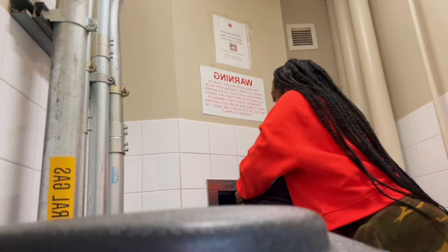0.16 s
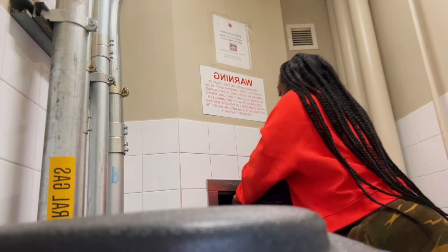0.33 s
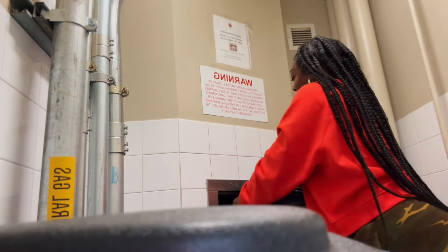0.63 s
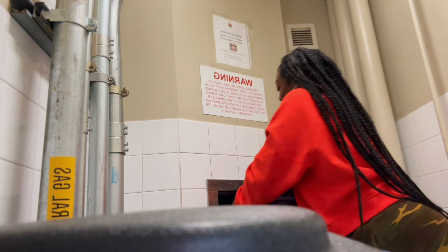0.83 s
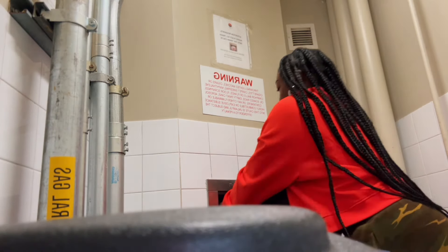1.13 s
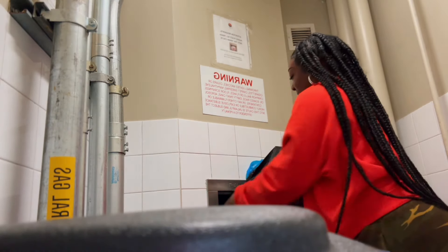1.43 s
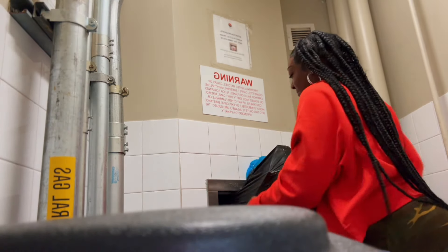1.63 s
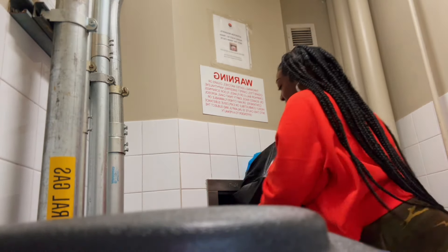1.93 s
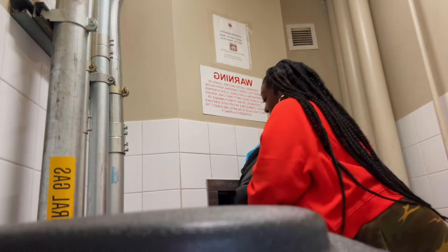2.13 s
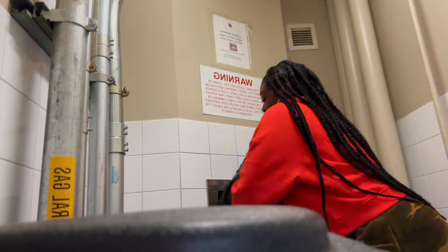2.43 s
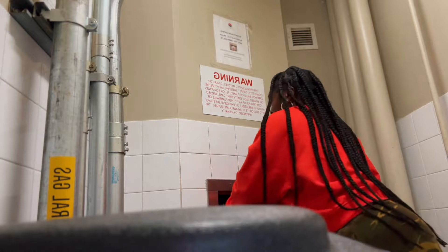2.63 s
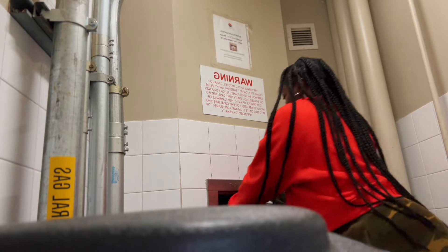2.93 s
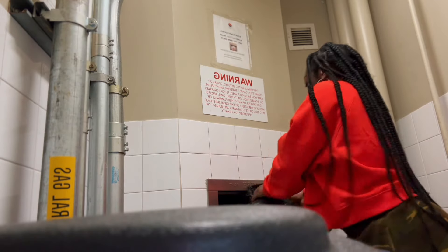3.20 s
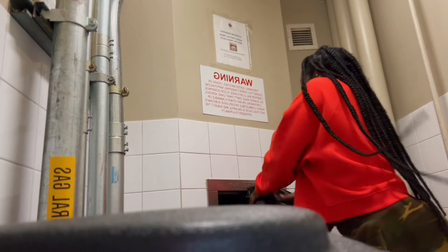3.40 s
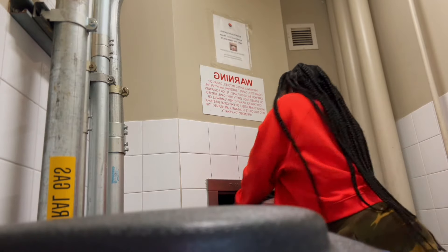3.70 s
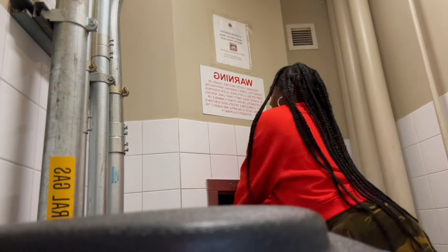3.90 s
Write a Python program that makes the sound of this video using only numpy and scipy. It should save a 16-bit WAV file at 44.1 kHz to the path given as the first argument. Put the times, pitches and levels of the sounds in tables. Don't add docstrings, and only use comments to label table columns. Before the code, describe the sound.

Close, busy crinkling of plastic film being pushed over hollow sheet steel, bumping and thudding in a small tiled room.

```python
import sys
import numpy as np
from scipy import signal
from scipy.fft import rfft, irfft, next_fast_len
from scipy.io import wavfile
from scipy.ndimage import uniform_filter1d

SR = 44100
rng = np.random.default_rng(int(sys.argv[2]) if len(sys.argv) > 2 else 0)


def to_wav(s):
    ch = np.atleast_2d(s).T
    pcm = np.round(np.clip(ch, -1, 1) * 32767)
    wavfile.write(sys.argv[1], SR, pcm.astype(np.int16))


def volts_from_decibels(level):
    exponent = np.asarray(level, float) / 20
    return 10 ** exponent


N = 178683

# pitch in Hz, level in dB, decay time t60 in s.
HOPPER_MODES = [(57, -31, 0.14), (87, 9, 0.24), (141.1, -8.5, 0.76), (163.4, 1.5, 0.23), (206.2, 0, 0.25),
                (272.3, -1.5, 0.14), (298.2, -3.5, 0.19), (361.3, -1, 0.18), (421.2, -1, 0.078),
                (504, -5, 0.014), (528, -7.5, 0.041), (594, -3, 0.13), (673, -3.5, 0.11),
                (694, -11.5, 0.14), (807, -3.5, 0.021), (780, -6, 0.0069), (888, -5, 0.064),
                (1026, -3, 0.02), (1054, -11, 0.037), (1275, -2, 0.1), (1650, -2, 0.014)]


def rms_one(x):
    return x / np.sqrt(np.mean(x ** 2) + 1e-20)


def over_hz(rows, size):
    hz, *columns = np.transpose(rows)
    grid = np.log(np.maximum(np.fft.rfftfreq(size, 1 / SR), 10))
    return [np.interp(grid, np.log(hz), column) for column in columns]


def drift(rate_hz):
    settle = 8000
    r = np.exp(-2 * np.pi * rate_hz / SR)
    noise = rng.standard_normal(N + settle)
    return rms_one(signal.lfilter([1], [1, -2 * r, r * r], noise)[settle:])


def ring(force, hz, t60):
    r = volts_from_decibels(-60 / (t60 * SR))
    w = 2 * np.pi * hz / SR
    return signal.lfilter([0, np.sin(w)], [1, -2 * r * np.cos(w), r * r], force + 1e-18)


def cut(x, hz, kind):
    return signal.sosfilt(signal.butter(3, hz, kind, fs=SR, output="sos"), x)


def efforts(rows, curve):
    s, db, rise, fall, last = np.transpose(rows)[:, :, None]
    dt = np.arange(N) / SR - s
    away = np.where(dt < 0, -dt / np.maximum(rise, .002), dt / np.maximum(fall, .01))
    return volts_from_decibels(db) * np.maximum(1 - away, 0) ** curve, last


def together_db(swells, rest_db):
    return 10 * np.log10(np.sum(swells ** 2, axis=0) + volts_from_decibels(2 * rest_db))


def creases(per_s, spread_db, clump_db, clump_hz):
    sizes = volts_from_decibels(spread_db * np.minimum(rng.exponential(1, N), 5)) * rng.choice([-1, 1], N)
    clumps = volts_from_decibels(clump_db * drift(clump_hz))
    happens = rng.random(N) < per_s / SR
    return rms_one(sizes * clumps * happens)


def film_colour(x):
    # frequency in Hz, spectral level in dB per Hz.
    film_spectrum = [(300, -4.5), (700, -3), (1500, 2), (2400, -4.5), (3100, -10), (3700, -14.5),
                     (6000, -17.5), (9000, -27), (12000, -28), (16500, -24)]
    size = next_fast_len(N)
    return irfft(rfft(x, size) * volts_from_decibels(over_hz(film_spectrum, size)[0]), size)[:N]


def facets(clicks, cycles):
    pitches = np.geomspace(500, 5000, 30)
    dealt = rng.integers(0, len(pitches), N)
    return rms_one(sum(ring(clicks * (dealt == k), hz, cycles / hz) * hz for k, hz in enumerate(pitches)))


def stroke_levels():
    # time of full effort in s, drag level in dB, build-up in s,
    # let-go in s, crispness of the film in dB.
    strokes = [(0.0, -28, .05, 0.046, 1), (.124, -18, 0.12, 0.14, 6.5), (.295, -26, 0.67, 0.1, -3.5),
               (.53, -32, 0.23, 0.086, 2.5), (.614, -35, 0.083, 0.057, 5.5), (.85, -30, 0.026, 0.11, -3),
               (.878, -20.5, 0.005, 0.23, 4.5), (1.028, -21.5, 0.21, .14, -3),
               (1.248, -30.5, 0.18, 0.17, 2.5), (1.372, -30, 0.16, 0.1, -1.5),
               (1.564, -34, 0.06, 0.22, -18), (1.676, -27, 0.012, 0.25, 0.5), (2.04, -22.5, 0.32, 0.17, -1),
               (2.11, -15.5, 0.11, 0.2, -1), (2.3, -25.5, 0.24, 0.24, 2.5),
               (2.518, -25.5, 0.0041, 0.31, 2.5), (2.7, -21.5, 0.28, 0.4, -0.5),
               (2.843, -22, 0.19, 0.077, -2), (3.09, -30, 0.14, 0.24, 1.5), (3.285, -43, 0.015, 0.027, -14),
               (3.36, -35.5, 0.12, 0.39, 5), (3.6, -26, .03, 0.055, -1.5), (3.67, -15.5, 0.13, 0.19, -1.5),
               (3.79, -17, 0.2, 0.21, -1.5), (4.05, -24, 0.36, .1, -3.5)]
    # time in s, tautness in dB.
    tautness = [(0, 0.5), (.1, -1.5), (.2, -8), (.35, -6.5), (.6, 8.5), (.75, -4), (.9, -0.5), (1.15, -5),
                (1.4, 5.5), (1.6, -4.5), (1.95, 2), (2.2, -3.5), (2.46, -1), (2.7, 0.5), (2.95, -5.5),
                (3.45, 2), (3.7, 0.5), (4.05, -1.5)]
    swells, crisp_db = efforts(strokes, curve=1.1)
    bag_rest_db, hiss_rest_db = -56, -34.5
    drag_db = together_db(swells, bag_rest_db)
    crisp_swells = swells * volts_from_decibels(crisp_db)
    crinkle_db = together_db(crisp_swells, bag_rest_db) - 11
    hiss_db = together_db(crisp_swells, hiss_rest_db) - 23
    taut_db = np.interp(np.arange(N) / SR, *np.transpose(tautness))
    return drag_db, crinkle_db + 0.33 * taut_db, hiss_db + taut_db


def slap_envelopes():
    # start in s, peak in dB, decay time t60 in s,
    # brightness in dB.
    slaps = [(0.053, -17, 0.19, -2), (0.0676, -6.5, 0.22, 7), (0.109, -13, 0.069, 7),
             (0.2936, -23, 0.056, -11), (0.796, -14, 0.65, -3), (0.871, -2, 0.21, 5.5),
             (1.005, -15.5, 0.27, 8.5), (1.544, -8.5, 0.13, -16), (1.668, -12.5, 0.17, -0.5),
             (2.0623, -8.5, 0.081, 9.5), (2.119, 2, 0.11, 1), (2.514, -18, 0.07, 2),
             (2.6164, -16, 0.094, 8.5), (2.774, -1, 0.13, -27), (2.99, -14, 0.77, 0), (3.12, -13, 0.18, 0),
             (3.54, -23, 0.21, 8), (3.623, -7, 0.21, 0), (3.665, -1, 0.13, -2)]
    dull, bright, t = np.zeros(N), np.zeros(N), np.arange(N) / SR
    for s, db, t60, bright_db in slaps:
        after = np.maximum(t - s, 0)
        fall = (t >= s) * volts_from_decibels(db - 16.5 - 60 * after / max(t60, .02))
        dull += fall * (1 - .85 * np.exp(-after / 0.0071))
        bright += fall * volts_from_decibels(bright_db - 6.0) * (1 + 0.24 * np.exp(-after / 0.0065))
    return dull, bright


def bag(drag_db, crinkle_db, hiss_db):
    cross_hz, hiss_hz = 2950, 6600
    dull, bright = slap_envelopes()
    rubbing = creases(3000, spread_db=1.6, clump_db=2.7, clump_hz=12.7)
    crinkling = creases(7000, spread_db=1.2, clump_db=2.1, clump_hz=19.4)
    dense = creases(15000, spread_db=2.7, clump_db=0.54, clump_hz=60)
    facet_clicks = creases(900, spread_db=2.04, clump_db=3.2, clump_hz=11)
    drag = film_colour(rubbing + 0.36 * facets(facet_clicks, cycles=78.0))
    burst = film_colour(dense)
    crinkle = rms_one(cut(film_colour(crinkling), cross_hz, "high"))
    middle = rms_one(cut(crinkle, hiss_hz, "low"))
    finest = rms_one(cut(crinkle, hiss_hz, "high"))
    sliding = rms_one(cut(drag, cross_hz, "low")) * volts_from_decibels(drag_db - 1.5)
    sliding = sliding + middle * volts_from_decibels(crinkle_db + 1.5) + finest * volts_from_decibels(hiss_db + 4.0)
    slap_low = rms_one(cut(burst, cross_hz, "low")) * dull
    slap_high = rms_one(cut(burst, cross_hz, "high")) * bright
    return sliding + slap_low + slap_high


def part_levels(drag_db):
    # time of full weight in s, level in dB, build-up in s,
    # let-go in s, pitch in Hz of the part that bears it.
    presses = [(0.0, -26, .05, 0.14, 600), (.12, -24, 0.57, 0.2, 226), (.456, -31, 0.05, 0.098, 160),
               (.59, -36, 0.15, 0.15, 235), (.804, -28, 0.023, 0.12, 490), (.9, -23.5, 0.066, 0.32, 213),
               (1.03, -19, 0.074, 0.14, 400), (1.232, -26.5, 0.36, 0.063, 156),
               (1.358, -26, 0.12, 0.14, 250), (1.554, -35, 0.038, 0.4, 650), (1.726, -25, 0.038, 0.11, 347),
               (1.814, -30, 0.1, 0.33, 80), (2.058, -24.5, 0.27, 0.13, 486), (2.146, -20, 0.16, 0.036, 300),
               (2.25, -15.5, 0.039, 0.067, 131), (2.4, -26.5, 0.24, 0.067, 376),
               (2.518, -21.5, 0.0079, 0.26, 504), (2.633, -18.5, 0.2, 0.13, 152),
               (2.709, -16, 0.086, 0.12, 675), (2.791, -27, .08, 0.083, 294),
               (3.127, -30.5, 0.027, 0.15, 500), (3.399, -40, 0.022, 0.059, 397),
               (3.692, -15, 0.088, 0.061, 190), (3.775, -14, 0.099, 0.04, 239),
               (3.815, -16.5, .012, 0.044, 300), (3.865, -20.5, .03, .12, 300)]
    # pitch in Hz, level in dB under a press, level in dB shaken by the drag, level in dB at rest.
    parts = [
        (80, -2.5, -28, -47.5),
        (170, -0.5, -7.5, -39),
        (328, -2.5, -5, -37),
        (700, 0.8, -8, -49),
    ]
    swells, press_hz = efforts(presses, curve=1.18)
    levels = []
    for hz, press_db, shake_db, rest_db in parts:
        spill_db = 1.5 * np.log2(hz / press_hz) ** 2
        pressed = swells * volts_from_decibels(press_db - spill_db)
        dragged = volts_from_decibels(drag_db + shake_db)
        levels.append(together_db(np.vstack([pressed, dragged]), rest_db))
    return levels


def shaken(modes, per_s, even_s):
    load = creases(per_s, spread_db=2.77, clump_db=0.76, clump_hz=22)
    rings = np.zeros(N)
    for k, (hz, db, t60) in enumerate(modes):
        shifted = np.roll(load, 3001 * k)
        rings += volts_from_decibels(db) * np.sqrt(.2 / t60) * ring(shifted, hz, t60)
    width = round(even_s * SR)
    power = uniform_filter1d(uniform_filter1d(rings ** 2, width), width)
    return rms_one(rings / np.sqrt(power + 1e-9) ** 0.38)


def knocks():
    # start in s, level in dB,
    # centre of the modes struck in Hz, spread in octaves, contact time in s.
    bumps = [(.175, -10, 145, 0.55, 0.0039), (.595, -20, 250, 0.79, 0.01), (.874, -18, 200, 0.5, 0.0082),
             (1.006, -11, 242, 1.1, 0.01), (1.18, -13.5, 250, 0.26, 0.013), (1.32, -17.5, 170, 0.6, 0.018),
             (1.78, -10, 60, 0.22, 0.02), (2.242, -6, 100, 0.25, 0.0067), (2.517, -20, 155, 0.29, 0.0041),
             (2.61, -19, 85, 0.57, .02), (2.68, -1, 194, 0.28, 0.071), (3.375, -19, 240, 0.4, 0.015),
             (3.657, -11, 130, 1, 0.012), (3.745, 6, 279, 0.15, 0.035), (3.765, -19, 86, 0.51, 0.016),
             (3.81, -13, 220, 0.76, 0.0075), (3.94, -25, 74.5, 0.38, 0.013), (.12, -10, 118, 0.66, 0.011),
             (1.015, -12, 86, 0.31, 0.0081), (1.74, -10, 60, 0.33, 0.019), (2.99, -17.5, 181, 0.3, .012),
             (3.035, -36, 180, 0.2, .012), (3.2, -21, 70, 0.44, .015), (3.405, -20, 80, 0.35, 0.012)]
    # start
    # in s, level in dB, centre in Hz, # spread in octaves, contact time in s.
    hard_blows = [(.075, -8, 356, 0.074, 0.005), (.11, -21, 345, 0.27, 0.011),
                  (1.254, -14, 680, 0.25, 0.01), (1.272, -17, 600, 0.087, 0.0094),
                  (1.674, -12.5, 600, 0.15, 0.0011), (1.714, -11.5, 332, 0.41, 0.0089),
                  (1.728, -12.5, 298, 0.1, 0.0068), (2.692, -6, 800, 0.4, 0.023),
                  (3.119, -15.5, 580, 0.15, 0.0023), (3.132, -30, 600, 0.088, 0.003),
                  (3.15, -28, 590, 0.1, 0.0068), (3.528, -19, 760, 0.42, 0.0061),
                  (2.138, -8.5, 314, 0.72, 0.0047), (3.91, -6.5, 290, 0.33, 0.04),
                  (3.98, -16.5, 290, 0.41, 0.016), (1.76, -15, 397, 0.13, .008),
                  (3.55, -22, 815, .08, .012)]
    blows = bumps + hard_blows
    out = np.zeros(N)
    phase = rng.uniform(0, 2 * np.pi, (len(blows), len(HOPPER_MODES)))
    for k, (hz, level_db, t60) in enumerate(HOPPER_MODES):
        force = np.zeros(N + 4000)
        for j, (s, db, centre_hz, spread, contact) in enumerate(blows):
            at, size = round(s * SR), int(np.clip(contact * SR, 40, 2000))
            step = np.arange(2 * size) / size
            near = np.exp(-.5 * (np.log2(hz / centre_hz) / max(spread, .05)) ** 2)
            swell = np.minimum(8 * step, 1) * np.exp(-2 * step)
            push = swell * np.sin(2 * np.pi * hz * step * size / SR + phase[j, k])
            force[at:at + 2 * size] += push * near * volts_from_decibels(db + 3.0) / size
        out += ring(force[:N], hz, 0.67 * t60)
    return out


def hopper(boom_db, weight_db, wall_db, rattle_db):
    part_edges_hz = [115, 240, 460]
    part = np.searchsorted(part_edges_hz, np.array(HOPPER_MODES)[:, 0])
    duct, tray, walls, door = [[m for m, p in zip(HOPPER_MODES, part) if p == k] for k in range(4)]
    boom = shaken(duct, per_s=500, even_s=0.091) * volts_from_decibels(boom_db - 2.5)
    weight = shaken(tray, per_s=600, even_s=0.02) * volts_from_decibels(weight_db - 4.5)
    flex = shaken(walls, per_s=800, even_s=0.0098) * volts_from_decibels(wall_db - 5.5)
    rattle = shaken(door, per_s=900, even_s=0.012) * volts_from_decibels(rattle_db - 5.5)
    return boom + weight + flex + rattle + knocks()


def crunches():
    # start in s, rms level in dB, pitch in Hz, bandwidth in Hz, length
    # in s.
    crunches_and_cracks = [(.105, -16.5, 1690, 197, 0.041), (0.15, -27, 1730, 400, 0.024),
                           (0.296, -26, 1590, 680, 0.025), (0.535, -25.5, 1500, 400, 0.015),
                           (0.8775, -14, 1650, 500, 0.007), (0.898, -15.5, 1970, 900, 0.008),
                           (1.257, -33, 2310, 500, 0.073), (2.065, -20.5, 2800, 990, 0.052),
                           (2.119, -19, 2510, 1300, 0.049), (2.63, -30, 3170, 250, 0.016),
                           (2.774, -29.5, 3450, 1720, 0.023), (2.85, -28, 1220, 500, 0.06),
                           (2.989, -34, 1030, 600, 0.028), (3.272, -33.5, 2480, 700, 0.025),
                           (3.276, -30.5, 1800, 700, .026), (3.282, -31, 965, 250, 0.012),
                           (3.291, -32, 1400, 400, .01), (3.328, -36, 3000, 1200, 0.017),
                           (3.324, -43, 5100, 700, .02), (3.37, -40, 2700, 300, .03),
                           (3.438, -45.5, 4550, 250, 0.045), (3.526, -27, 790, 300, 0.035),
                           (3.527, -26, 520, 350, 0.017), (3.535, -34, 1200, 400, .014), (3.54, -42, 4500, 1200, .04),
                           (.075, -24, 3200, 900, .018), (0.907, -30, 4400, 2000, 0.041),
                           (2.068, -31, 4800, 1800, 0.017), (2.15, -33, 4200, 2000, .025),
                           (1.254, -32, 900, 700, .004), (3.119, -30, 900, 800, .004),
                           (2.1195, -21, 7000, 4300, 0.0025), (.121, -17, 1800, 900, .005),
             (.141, -19, 1500, 900, 0.0046), (3.735, -22, 1000, 250, .012),
             (0.8712, -15.5, 5200, 1500, 0.0036), (.919, -21, 2200, 1200, .006), (1, -26, 2000, 1200, .006),
             (0.875, -25, 4750, 1900, 0.033), (0.878, -21, 1900, 900, .004),
             (0.889, -18, 2200, 1200, 0.0035), (.8096, -40, 2700, 500, 0.017),
             (2.516, -29, 6500, 3100, 0.0042), (2.546, -37, 3000, 1500, .006),
             (2.705, -31, 3800, 2300, .006), (2.782, -30, 3880, 1400, 0.007),
             (2.136, -30, 4600, 2000, 0.0079), (2.179, -25, 2880, 820, 0.013), (2.8, -39, 2700, 900, 0.011),
             (2.1, -30, 3000, 1500, .008), (1.1, -37.5, 2980, 1400, 0.012), (1.672, -31, 2600, 600, 0.017),
             (3.38, -47, 4480, 1200, .015), (3.59, -37, 1500, 800, 0.023), (3.639, -20, 2200, 1200, 0.015),
             (3.757, -25, 2700, 1500, 0.009), (.535, -46, 4100, 2000, .01), (0.67, -42, 5000, 2500, 0.0093),
             (2.795, -36, 3700, 1500, 0.0077), (2.8, -41, 2500, 1500, .006), (3.224, -28, 600, 500, .003),
             (.1, -25, 2800, 900, .005), (.069, -25, 2100, 800, .004), (.15, -21, 2000, 1200, .004),
             (2.079, -19, 600, 600, 0.0037), (2.087, -23, 1400, 800, .005), (2.3, -22, 770, 800, .004),
             (2.122, -19, 1500, 700, .006), (2.126, -25, 2900, 820, 0.0091), (3.408, -31, 1000, 900, .003),
             (3.58, -26, 1430, 700, .006)]
    out = np.zeros(N)
    clicks = creases(6000, spread_db=0.57, clump_db=0.51, clump_hz=60)
    for s, db, hz, width_hz, length in crunches_and_cracks:
        at, size = round(s * SR), round(max(length, .002) * SR)
        r = np.exp(-1.5 * np.pi * width_hz / SR)
        peak = [1, 0, -1, 1, -2 * r * np.cos(2 * np.pi * hz / SR), r * r]
        tone = signal.sosfilt([peak, peak], clicks[at:at + 2 * size])
        step = np.arange(2 * size) / size
        swell = np.minimum(6 * step, 1) * np.exp(-1.5 * step ** 2)
        out[at:at + 2 * size] += volts_from_decibels(db + 1.5) * rms_one(tone) * swell
    return out


def brief_tones():
    # start in s, rms level in
    # dB, start pitch in Hz, end pitch in Hz, length in s.
    hoots_and_hums = [(1.253, -26.5, 700, 700, 0.017), (1.27, -25, 605, 610, .024), (3.119, -27, 607, 580, 0.0087),
                      (3.132, -28, 600, 577, 0.015), (1.716, -22.5, 370, 350, .009), (1.724, -20, 293, 294, 0.015),
                      (3.806, -16.5, 287, 280, 0.022), (3.855, -21.5, 330, 300, .022), (3.905, -25, 291, 280, .04),
                      (3.712, -19, 750, 750, 0.013), (3.76, -22, 740, 760, .018), (3.806, -22, 680, 670, .02),
                      (2.688, -22, 675, 685, .02), (1.012, -20.5, 300, 280, 0.03), (1.025, -25.5, 600, 590, .02),
                      (1.322, -25, 198, 195, .018),
                      (.176, -21.5, 150, 140, 0.038), (2.243, -26, 214, 205, .015), (2.245, -21, 143, 141, .11),
            (2.514, -17, 160, 163, .022), (2.598, -24.5, 88, 86, .06), (2.665, -22, 200, 204, .06),
            (2.148, -16.5, 317, 300, .01), (2.735, -25.5, 590, 605, 0.032), (2.768, -25, 530, 520, 0.017),
            (1.295, -31.5, 530, 540, .03), (1.745, -28, 347, 403, .022), (2.692, -27, 820, 810, .014),
            (3.55, -28.5, 800, 720, .03), (3.765, -20, 90, 92, .05), (3.675, -20, 220, 212, 0.039),
            (1.0, -22, 87, 85, 0.036), (3.805, -21.5, 150, 165, .035), (3.83, -24.5, 89, 90, .06),
            (3.665, -23.5, 360, 362, .03), (3.675, -23, 510, 500, 0.022), (3.75, -25, 385, 380, .045),
            (3.935, -25, 83, 72, 0.026), (.995, -19, 173, 158, 0.044), (.42, -31.5, 86, 85, .06),
            (.88, -26.5, 84, 87, 0.076), (3.118, -32, 425, 420, .015), (2.995, -30, 300, 295, .014),
            (3.015, -32, 365, 370, .014), (.6, -28.5, 205, 200, 0.027), (2.14, -24, 423, 400, 0.023),
            (.17, -24.5, 300, 290, .02), (.885, -25.5, 295, 295, .018), (.85, -29, 159, 158, 0.062),
            (3.81, -24, 905, 860, .02)]
    out, throb = np.zeros(N), volts_from_decibels(2.3 * drift(66.0))
    for s, db, start_hz, end_hz, length in hoots_and_hums:
        at, size = round(s * SR), round(max(length, .005) * SR)
        step = np.arange(2 * size) / size
        hz = end_hz + (start_hz - end_hz) * np.clip(1.3 - 1.5 * step, 0, 1)
        swell = np.minimum(9 * step, 1) * np.exp(-1.2 * step ** 3)
        out[at:at + 2 * size] += volts_from_decibels(db + 2.5) * swell * np.sin(2 * np.pi * np.cumsum(hz) / SR)
    return out * throb


def room(x):
    hop, t = 4096, np.arange(round(.4 * SR)) / SR
    out = np.zeros((2, N + 4 * hop + len(t)))
    padded = np.pad(x, (hop, 2 * hop))
    fall = volts_from_decibels(-60 * t / 0.17) * (t > .003)
    window = np.sin(np.pi * np.arange(2 * hop) / (2 * hop))
    for i in range(0, N + hop, hop):
        piece = padded[i:i + 2 * hop] * window
        cloud = rng.standard_normal((2, len(t))) * fall / np.sqrt(np.sum(fall ** 2))
        out[:, i:i + 2 * hop + len(t) - 1] += signal.fftconvolve(piece[None], cloud, axes=1)
    return out[:, hop:hop + N]


def ports(near, other):
    # frequency in Hz, sum in dB, difference in dB, share in phase with the sum,
    # share in quadrature with the sum.
    port_pair = [(60, 0.5, -64, 0.45, 0.00012), (170, -1.5, -39, 0.71, -0.7), (250, 2, -18, 0.31, -0.98),
                 (600, 3.5, -4, 0.23, -1.06), (1720, -1, -9, 0.67, -1.1), (2390, 0, -3, -0.019, -0.53),
                 (3400, -1.5, -1.5, -.14, -0.92), (4320, -0.5, -5, -0.15, 0.23),
                 (6640, -3.5, -1.5, -0.15, 0.67), (7550, -17.5, 3.5, 0, 0.65), (9240, -12, 6, -0.05, 0.028),
                 (9930, 0.5, 1, -0.11, -0.72), (10960, 4, 5, .1, -0.61), (12500, 2.5, -32, 0, 0),
                 (14200, -0.5, -42, 0, 0.14), (14840, 1, -3, 0, .2)]
    size = next_fast_len(N + 4096)
    sum_db, diff_db, inphase, quad = over_hz(port_pair, size)
    inphase, quad = np.clip(inphase, -.52, .52), np.clip(quad, -.24, .24)
    own = np.sqrt(1 - inphase ** 2 - quad ** 2)
    a, b = rfft(near, size), rfft(other, size)
    mid = irfft(a * volts_from_decibels(sum_db), size)[:N]
    side = irfft(((inphase + 1j * quad) * a + own * b) * volts_from_decibels(diff_db), size)[:N]
    return np.array([mid + side, mid - side])


def scene():
    drag_db, crinkle_db, hiss_db = stroke_levels()
    film = bag(drag_db, crinkle_db, hiss_db) + crunches()
    steel = hopper(*part_levels(drag_db)) + brief_tones()
    air = volts_from_decibels(-37) * rms_one(film_colour(rng.standard_normal(N)))
    first, second = room(film + steel + air)
    wet = volts_from_decibels(-9)
    echoed_film = (film + wet * cut(first, 534, "high")) / np.sqrt(1 + wet ** 2)
    return ports(echoed_film + steel + air, second)


def band_limit(x):
    return signal.sosfilt(signal.butter(12, 15940, fs=SR, output="sos"), x)


def record(dry):
    rounded = 1.163 * np.tanh(cut(dry, 46.6, "high") / 1.221)
    mix = signal.sosfilt(signal.cheby2(14, 70, 16200, fs=SR, output="sos"), rounded)
    return band_limit(mix)


dry = scene()
out = record(dry)
to_wav(out)
```